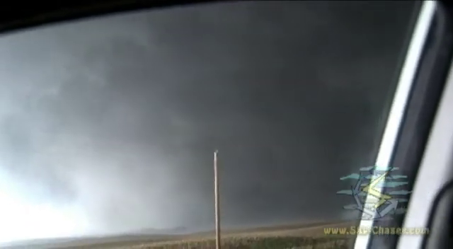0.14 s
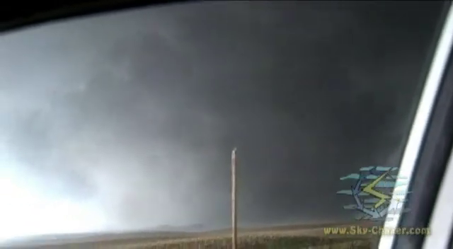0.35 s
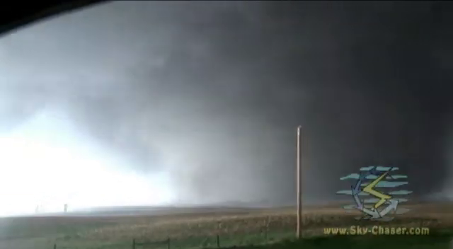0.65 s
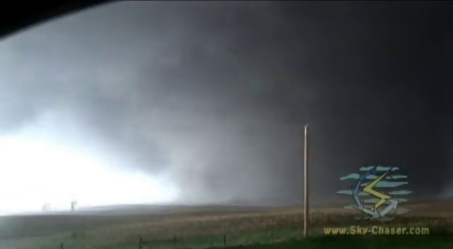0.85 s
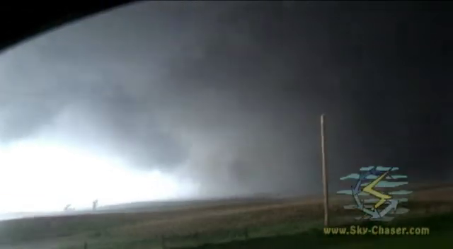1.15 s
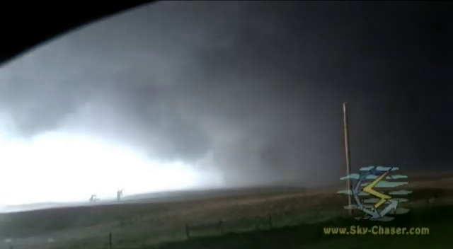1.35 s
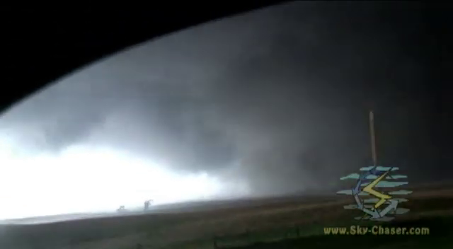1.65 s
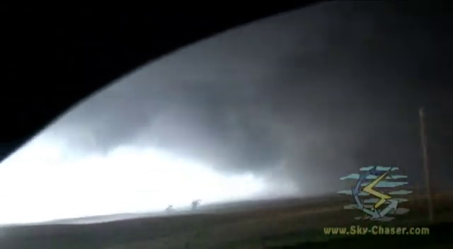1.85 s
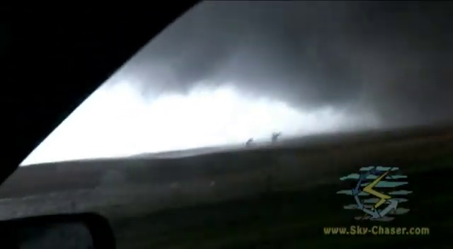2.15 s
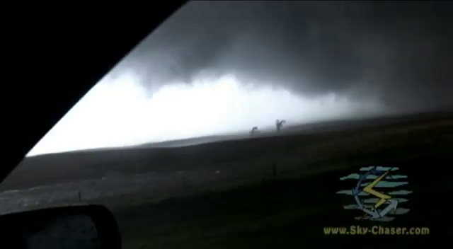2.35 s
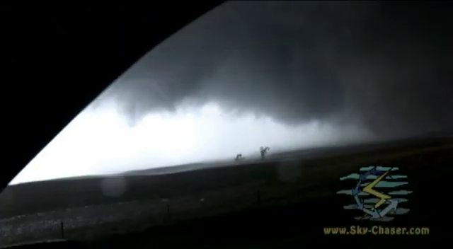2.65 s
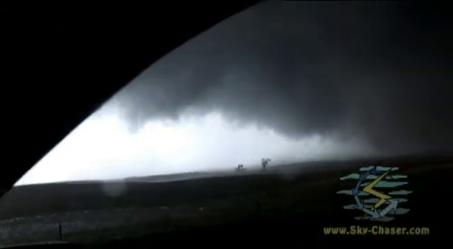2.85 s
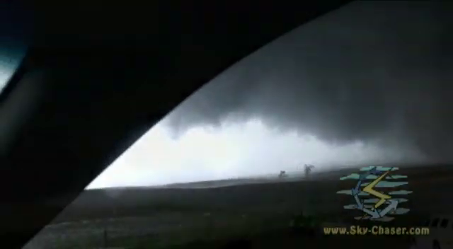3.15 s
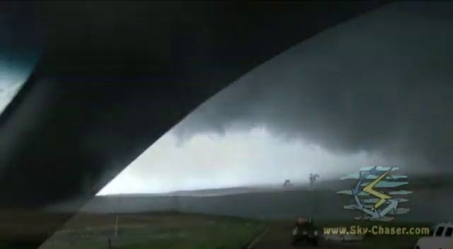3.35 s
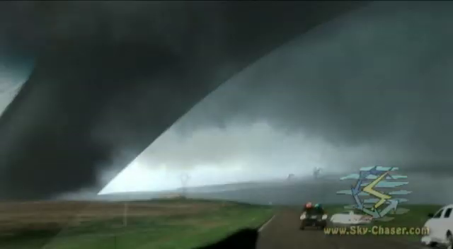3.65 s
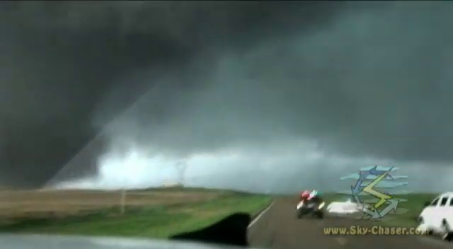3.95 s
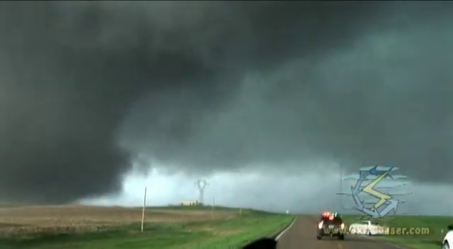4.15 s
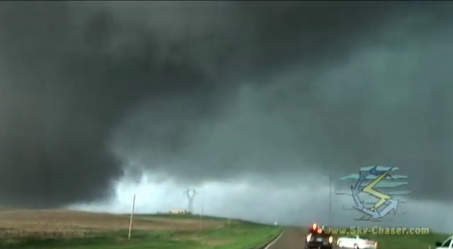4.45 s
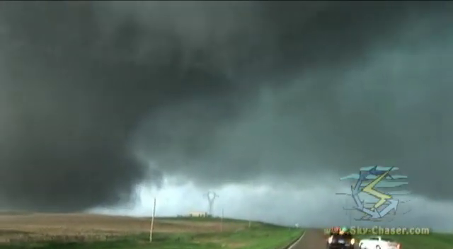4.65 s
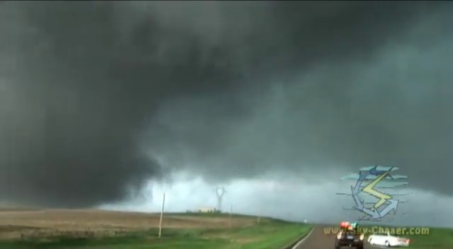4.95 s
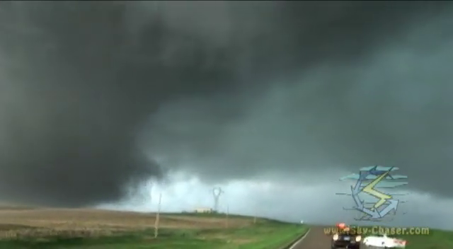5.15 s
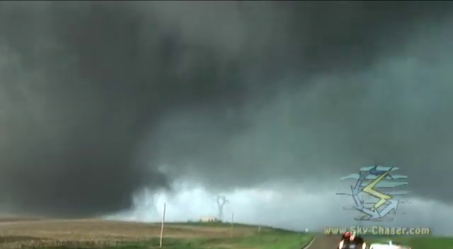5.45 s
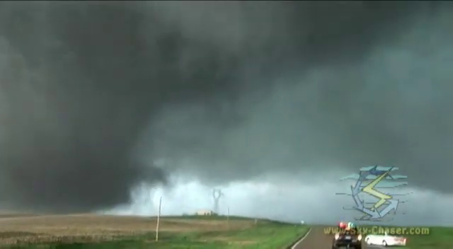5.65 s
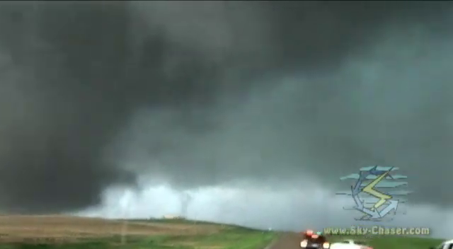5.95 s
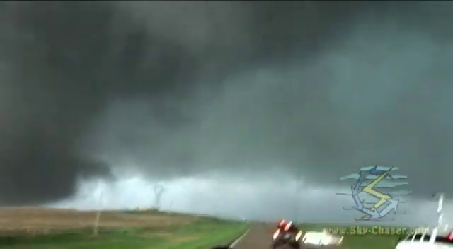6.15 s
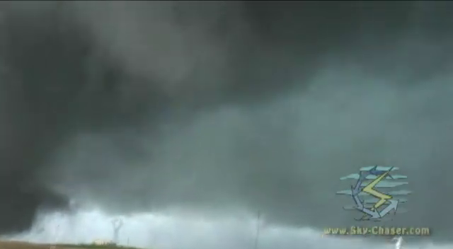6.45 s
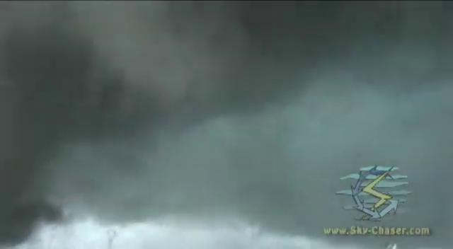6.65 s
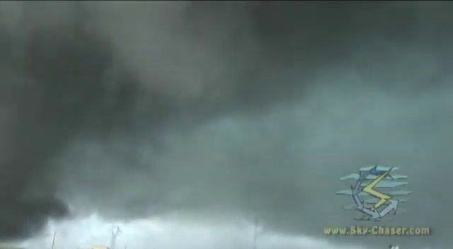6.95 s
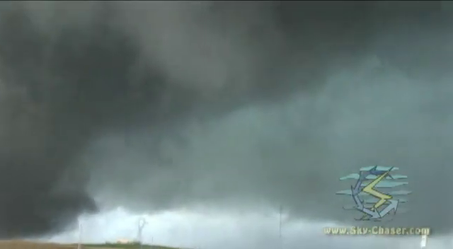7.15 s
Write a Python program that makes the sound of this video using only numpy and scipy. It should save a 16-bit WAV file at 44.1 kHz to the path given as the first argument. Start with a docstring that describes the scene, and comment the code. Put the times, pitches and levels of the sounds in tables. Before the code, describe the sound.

Storm wind heard from a car on open grassland. At first it is sheltered: lumpy cabin rumble, airy window rush, scattered rain splashes, small plastic ticks and a few dull knocks, one strong. Then the exposed stereo microphone is struck directly by gusts, and the sound becomes a much louder tearing, fluttering roar with sharp overload pops, continuing to the cut.

```python
"""Storm wind tears across a camera's two-port microphone in a car with its side window open.
The airstream is noise in three layers, roar, tearing and hiss, shaken by gusts, lulls and flutter.
It arrives after about three seconds, with a low burble and pops made of short pressure pulses.
Before that the sheltered cabin booms and air rushes at the window, both made of coloured noise.
Rain is splash-shaped noise, knocks are fading panel tones with clatter, and ticks and whistles are narrow noise."""
import sys
import numpy as np
from scipy import signal
from scipy.fft import rfft, irfft, next_fast_len
from scipy.io import wavfile
from scipy.ndimage import uniform_filter1d

SR = 44100
rng = np.random.default_rng(int(sys.argv[2]) if len(sys.argv) > 2 else 0)


def transcribe(signal):
    """Save signal, clipped to [-1, 1], as a 16-bit WAV file at the path in sys.argv[1]."""
    frames = np.atleast_2d(signal).T
    limited = np.clip(frames, -1, 1)
    pcm = np.round(limited * 32767).astype(np.int16)
    wavfile.write(sys.argv[1], SR, pcm)


N = 321930
TIME = np.arange(N) / SR
SIZE = 2 * next_fast_len(N // 2 + 8192)  # transform length, with spare room for sounds to ring out
HZ = np.fft.rfftfreq(SIZE, 1 / SR)

# slow drift of the sheltered air: start_s, window_rush_db, cabin_rumble_db
SHELTER = [(0, -40, -30), (.55, -40, -34.5), (.88, -41, -36), (1.3, -39, -31), (1.68, -43, -37.5),
           (2.3, -41.5, -33.5), (2.7, -42, -36.5), (2.9, -41.5, -27), (3.15, -43.5, -28.5)]
# colour of the airstream at the two ports: pitch_hz, level_db (per Hz), left_minus_right_db, likeness (0-1)
STREAM_COLOUR = [(25, -16, 4, 0.9), (67, -6.5, -0.5, 0.93), (135, 1.5, 2, 0.96), (288, 1.5, 1, 0.54),
                 (583, -4, 0, 0), (945, -5, 5, 0.34), (1530, -10, 1, 0.75), (2520, -14, 1, 0.88),
                 (2820, -19.5, 0.5, 1), (3200, -17.5, 0, 1), (4270, -23.5, 2.5, 0.56),
                 (5850, -25, 3.5, 0.54), (7850, -44.5, -1.5, 0.89), (8600, -32, 3, 0.53),
                 (9200, -38.5, 1.5, 0.7), (13600, -32.5, 8, 0.03)]
# colour of the window rush: pitch_hz, level_db (per Hz), left_minus_right_db, likeness (0-1)
RUSH_COLOUR = [(90, -8, .3, 0.86), (314, -13.5, 1.2, 0.88), (490, -16.5, 6.3, 0.66), (730, -17, 1.4, 0.55),
               (1250, -19.5, 0.56, 0.77), (1830, -21, 1, 0.78), (2140, -21.5, 0.72, 0.93),
               (3460, -29, 0.81, 0.91), (4670, -43.5, 2.9, 0.36), (5850, -60, 2.7, 1), (6700, -71, .5, 1),
               (10200, -47, 1.7, .56), (14500, -65, 2.5, .3)]
# colour of the raindrops: pitch_hz, level_db (per Hz), left_minus_right_db, likeness (0-1)
DROP_COLOUR = [(300, -8, -5, 1), (1200, 3.5, -4, 0.51), (3300, 7.5, 1, 0.67), (4560, 1, 2.5, 0.35),
               (5940, 2.5, 3, 0.76), (7000, -9.5, -2, 0.94), (10300, -9.5, 3.5, 0.36), (14000, -5, 2, .3),
               (16000, -11, 2, .3)]
# colour of the cabin's rumble: pitch_hz, level_db (per Hz)
RUMBLE_COLOUR = [(30, -13.5), (70, -5), (110, 1), (175, -2), (225, -6.5), (290, -23), (700, -54),
                 (2000, -80)]
# colour of the cabin's slow swings: pitch_hz, level_db (per Hz)
SWING_COLOUR = [(8, -3.5), (20, -1), (34, -3), (55, -9), (85, -18.5), (160, -30), (500, -99)]
# resonances of the window gap: pitch_hz, width_hz, level_db
GAP = [(480, 83, -8.5), (1562, 170, -16), (2350, 350, -10), (5250, 120, -29)]
# moments when the flow stalls: centre_s, depth_db, half_length_s
LULLS = [(.066, 6, 0.016), (.403, 3, 0.014), (.54, 4, .009), (.73, 10, 0.012), (.83, 1.5, 0.045),
         (1.128, 6, 0.006), (1.413, 13, 0.009), (1.522, 11, 0.0094), (1.594, 8, 0.01), (1.982, 8.5, 0.01),
         (2.059, 6.5, 0.019), (2.375, 11, 0.013), (2.501, 5.5, 0.024), (2.815, 5, 0.011), (3.11, 6, 0.012),
         (3.18, 5.5, 0.011), (3.385, 6, 0.007), (3.426, 4, 0.0099), (3.536, 4, 0.008), (3.617, 4, 0.0063),
         (3.656, 5.5, .006), (3.732, 3, 0.01), (3.989, 8.5, 0.0075), (4.11, 3.5, 0.022), (4.142, 5.5, 0.01),
         (4.48, 6, 0.006), (4.592, 3, 0.027), (4.658, 9, 0.0041), (4.765, 6, 0.0049), (4.827, 2.5, .011),
         (5.288, 2, 0.027), (5.332, 6, 0.0053), (5.5, 4.5, 0.019), (5.67, 3.5, .008), (5.736, 7, 0.0051),
         (5.946, 6, 0.0071), (5.991, 2, .006), (6.137, 3, .012), (6.362, 5, 0.013), (6.4, 3.5, 0.03),
         (6.643, 3, .007), (6.826, 7.5, 0.014), (6.899, 7, 0.019), (7.107, 4, 0.0071), (7.255, 3, .008)]
# large raindrops splashing on the window frame: start_s, level_db
DROPS = [(0.2219, -36.5), (0.3153, -43), (0.338, -36), (.371, -43), (0.571, -34), (0.655, -39.5),
         (0.7642, -43), (0.922, -37.5), (1.059, -42), (1.157, -42), (1.238, -49), (1.271, -47),
         (1.296, -47), (1.3518, -41), (1.3758, -35.5), (1.448, -38.5), (1.492, -39.5), (1.7264, -37),
         (1.815, -46), (1.872, -48), (1.9107, -42), (1.947, -35), (2.101, -43), (2.124, -39.5),
         (2.184, -41), (2.224, -37), (2.336, -35), (2.405, -32.5), (2.4384, -38.5), (2.6, -35.5),
         (2.7142, -37.5), (2.842, -48), (2.8615, -36), (2.9185, -38), (3.039, -47), (3.068, -41)]
# light ticks of hard plastic: start_s, level_db, pitch_hz, width_hz
TICKS = [(1.107, -25, 2300, 800), (1.45, -22, 2750, 1500), (1.692, -17.5, 2290, 500)]
# knocks against the door: start_s, boom_db, clatter_db
KNOCKS = [(.355, -20, -36), (1.152, -26, -41), (1.7626, -15.5, -16), (1.772, -32, -25),
          (2.124, -21.5, -35.5), (2.86, -24, -42)]
# ringing tones of the door panel: pitch_hz, level_db, fade_by_60_db_s
PANEL = [(132.6, 8.5, 0.075), (309, 8.5, 0.031), (613, 12.5, 0.017), (917, -8, 0.047), (1355, 3.5, 0.02),
         (2260, -5.5, 0.061), (2590, -5, .045), (3480, -8, 0.045), (5600, -10, .035)]
# colour of the clattering loose trim: pitch_hz, level_db (per Hz)
CLATTER_COLOUR = [(100, -2), (350, 5.5), (600, 2), (900, -9), (1400, -6.5), (1900, -10.5), (2400, -4),
                  (3000, -12), (3550, -12), (4200, -14.5), (4700, -24), (5200, -12), (5700, -18),
                  (7200, -28), (11000, -25), (16000, -27)]
# sharp pops at the grille: peak_s, level_db
POPS = [(3.884, -16), (5.461, -14), (5.714, -14), (5.895, -14), (5.974, -13), (6.19, -14), (6.339, -8),
        (7.129, -10), (7.135, -11), (7.271, -14), (7.282, -12)]
# the cavity between the ports turns one against the other: pitch_hz, left_lead_radians
PORT_LEAD = [(300, -.15), (800, -.1), (1300, -.6), (2200, -.35), (3300, 0), (3700, .3), (4400, 1.5),
             (5100, 1.5), (5700, 2.7), (7000, 3.1), (9300, 3.4), (10000, 5.8), (14000, 6.4), (16000, 8)]
# edges whistle and hiss hoarsely: centre_s, level_db, half_length_s, pitch_hz, width_hz
WHISTLES = [(.3, -46, 0.22, 1547, 170), (2.747, -42, 0.058, 1710, 290), (6.53, -34, 0.12, 2710, 1700),
            (6.73, -37, .04, 2910, 1400), (7.123, -41.5, 0.13, 3096, 1000)]
# gusts that strengthen the fine drops: centre_s, extra_db, half_length_s
FLURRIES = [(.33, 0, 0.065), (1.24, 9.5, 0.15), (1.79, 7.5, 0.026)]
# pressure buffets through the open window: centre_s, extra_db, half_length_s
BUFFETS = [(.118, 4, 0.056), (.373, 7, .025), (1.143, 7, 0.042), (1.385, 15, 0.045), (1.53, 6.5, 0.061),
           (1.954, 10, 0.026), (2.361, 9, 0.017), (2.788, 6, .03), (3.35, 10.5, 0.087)]
# the grille's hiss, which changes as the camera turns in the airstream: start_s, level_db
HISS = [(3.5, -46), (4.4, -46), (4.85, -45), (5.15, -46.5), (5.75, -45.5), (6.1, -46), (6.5, -48),
        (7.3, -50)]
# gusts that strike the ports: centre_s, extra_tearing_db, extra_roar_db, half_length_s
GUSTS = [(3.31, 5, 0, 0.0075), (3.356, 4, 11.5, 0.0062), (3.408, 4, -1, .006), (3.446, 4, 4, 0.007),
         (3.512, 7, 4, 0.013), (3.566, 8.5, 6, 0.0041), (3.631, 2, 4, 0.0076), (3.674, 5.5, 5, 0.0076),
         (3.758, 4, 9, 0.0084), (3.823, 4.5, -3, 0.0075), (3.885, 5, 1, 0.016), (4.003, -0.5, 9, 0.0062),
         (4.168, 4.5, 3, 0.012), (4.236, 5.5, 3, 0.009), (4.349, 8, -4, 0.0043), (4.379, 6, -8, 0.01),
         (4.424, 5.5, 0, 0.011), (4.462, 6, 6, 0.0091), (4.506, 6.5, 4.5, 0.02), (4.71, 3, 2.5, 0.047),
         (4.787, 5, 3, 0.0083), (4.862, 5, -4, 0.015), (4.93, 3, 6.5, 0.018), (5.366, 5, 4.5, 0.024),
         (5.414, 6.5, 4, 0.0082), (5.442, 3, -1.5, 0.035), (5.761, 1, 8.5, .007), (5.798, -2, 7, 0.0094),
         (5.925, 4, 6, 0.0069), (6.012, 7, -1, 0.013), (6.065, 6.5, 4, 0.0067), (6.185, 4.5, 4, 0.0087),
         (6.314, 2.5, 1.5, 0.019), (6.534, 3, -2.5, 0.038), (6.585, 6.5, -1, 0.0054), (6.658, 1, 5, 0.011),
         (6.755, 2, 3.5, 0.033), (6.955, 2, 7, 0.0094), (7.04, 4, 4, 0.01), (7.128, 5, 4, .005),
         (7.147, 6, 3, 0.01), (7.219, 1.5, 7, 0.01), (7.283, 2, 0, 0.0042)]

# the bands that the levels refer to: low_hz, high_hz
SWING_BAND, RUMBLE_BAND, RUSH_BAND, DROP_BAND = (18, 80), (90, 280), (600, 4000), (4000, 16000)
ROAR_BAND, TEAR_BAND, HISS_BAND, FULL_BAND = (100, 500), (700, 4000), (9000, 16000), (20, 16000)
# level of the swing between buffets, and the part of a buffet that the rumble follows
SWING_DB, BUFFET_RUMBLE_SHARE = -31, 0.14
# the microphone moves into the airstream: when it starts and how long it takes
EXPOSED_S, EXPOSING_S = 3.053, 0.54
# from then on the air sounds of the shelter die away
SHELTER_ENDS_S, RUSH_FADE_DB_PER_S, RUMBLE_FADE_DB_PER_S, SWING_FADE_DB_PER_S = 3.15, 16, 32, 41
ROAR_DB, TEAR_DB = -29.5, -30.5  # before gusts, lulls and flutter
DROP_SPLASH_S, DROP_SNAP_S = 0.006, 0.00045  # decay times
CEILING = 0.62  # peaks are rounded off towards this share of full scale
EDGE_HZ = 15880  # upper limit of the sound


def gain_of(db):
    """Turns decibels into amplitude."""
    return 10 ** (np.asarray(db) / 20)


def read(points):
    """Reads each column of a colour table at every frequency, on a log-frequency axis."""
    hz, *columns = np.transpose(points)
    return [np.interp(np.log(HZ + 1), np.log(hz), column) for column in columns]


def follow(rows):
    """Reads each column of a time table at every sample."""
    s, *columns = np.transpose(rows)
    return [np.interp(TIME, s, column) for column in columns]


def bumps(rows):
    """Adds up brief bell-shaped changes of level, in dB."""
    return sum(db * np.exp(-((TIME - s) / half) ** 2) for s, db, half in rows)


def gust_bumps():
    """Gives the changes that the gusts make to the tearing and to the roar, in dB."""
    tear_db = bumps((s, tear, half) for s, tear, _, half in GUSTS)
    roar_db = bumps((s, roar, half) for s, _, roar, half in GUSTS)
    return tear_db, roar_db


def exposure():
    """Rises steadily from 0 to 1 as the microphone moves into the airstream."""
    return np.clip((TIME - EXPOSED_S) / EXPOSING_S, 0, 1)


def fading(db_per_s):
    """Gives the level that a sheltered sound loses once the microphone is out in the wind, in dB."""
    return db_per_s * np.maximum(TIME - SHELTER_ENDS_S, 0)


def add(mix, s, sound):
    """Mixes a sound in at a time, cutting it off at the end."""
    part = mix[..., round(s * SR):][..., :sound.shape[-1]]
    part += sound[..., :part.shape[-1]]


def wander(slow_hz, fast_hz):
    """Makes turbulence of unit size, with about equal power per octave between two rates."""
    shape = HZ / (HZ ** 2 + slow_hz ** 2) ** (3 / 4) / (1 + (HZ / fast_hz) ** 2)
    x = irfft(rfft(rng.standard_normal(SIZE)) * shape)[:N]
    return x / x.std()


def causal(db):
    """Gives the response of a body that has this gain and rings only after it is struck."""
    log_gain = np.log(gain_of(db))
    circle = np.concatenate([log_gain, log_gain[-2:0:-1]])  # mirrored into the negative frequencies
    return np.exp(np.conj(signal.hilbert(circle)))[:len(HZ)]


def band_gain(power, band):
    """Gives the average (rms) level of unit white noise in a band after this power response."""
    low_hz, high_hz = band
    return np.sqrt(np.mean(power * (HZ > low_hz) * (HZ < high_hz)))


def coloured(x, colour, band):
    """Filters a sound to a colour so that unit white noise keeps unit level in a band."""
    response = causal(read(colour)[0])
    return irfft(rfft(x, SIZE) * response / band_gain(abs(response) ** 2, band))[..., :N]


def ports(pair, colour, band):
    """Mixes two separate noises in the cavity behind the grille, at unit gain in a band."""
    db, balance_db, like = read(colour)
    like, lead = np.clip(like, 0, 1), read(PORT_LEAD)[0]
    # the common part is alike at both ports; the opposed part has opposite signs
    common = np.sqrt((1 + like) / 2) * np.ones((2, 1))
    opposed = np.sqrt((1 - like) / 2) * np.array([[1], [-1]])
    share = gain_of([balance_db / 2, -balance_db / 2])
    share = share / np.linalg.norm(share, axis=0)
    response = causal(db) * share * np.exp([0 * lead, -1j * lead])
    power = abs((response * common).mean(0)) ** 2 + abs((response * opposed).mean(0)) ** 2
    left, right = rfft(pair, SIZE)
    mixed = (common * (left + right) + opposed * (left - right)) / np.sqrt(2)
    return irfft(response * mixed)[:, :N] / band_gain(power, band)


def eddies(depth_db, slow_hz, fast_hz):
    """Makes noise at each port that swells and collapses with that port's own eddies."""
    swell = gain_of(depth_db * np.array([wander(slow_hz, fast_hz), wander(slow_hz, fast_hz)]))
    return swell / np.sqrt(np.mean(swell ** 2)) * rng.standard_normal((2, N))


def narrow(hz, width_hz):
    """Makes noise of unit level in one fixed resonance."""
    x = signal.lfilter(*signal.iirpeak(hz, hz / width_hz, SR), rng.standard_normal(N))
    return x / x.std()


def drifting(hz, width_hz, octaves, slow_hz, fast_hz):
    """Makes noise of unit level in a resonance whose centre wanders."""
    turns = np.cumsum(hz * 2 ** (octaves * wander(slow_hz, fast_hz))) / SR
    shape = 1 / (1 + (2 * HZ / width_hz) ** 2)
    a, b = irfft(rfft(rng.standard_normal((2, SIZE))) * shape)[:, :N]
    x = a * np.cos(2 * np.pi * turns) + b * np.sin(2 * np.pi * turns)
    return x / x.std()


def cabin():
    """The air in the car booms in lumps and swings slowly with each buffet, alike at both ports."""
    buffet_db = bumps(BUFFETS)
    rumble_db = follow(SHELTER)[1] + BUFFET_RUMBLE_SHARE * buffet_db - bumps(LULLS)
    rumble_db = rumble_db - fading(RUMBLE_FADE_DB_PER_S) + wander(slow_hz=8.2, fast_hz=25)
    swing_db = SWING_DB + buffet_db - fading(SWING_FADE_DB_PER_S)
    rumble = coloured(rng.standard_normal(N), RUMBLE_COLOUR, RUMBLE_BAND)
    swing = coloured(rng.standard_normal(N), SWING_COLOUR, SWING_BAND)
    swing /= np.sqrt(uniform_filter1d(swing ** 2, size=4000))  # evens out its own ups and downs
    return gain_of(rumble_db) * rumble + gain_of(swing_db) * swing


def window_rush(flutter_db=1.65, stream_db=-0.2):
    """Air shears off the window edge, now and then stalling, and stirs the hollow resonances of the gap."""
    rush_db = follow(SHELTER)[0] - bumps(LULLS) - fading(RUSH_FADE_DB_PER_S)
    force = gain_of(rush_db + flutter_db * wander(slow_hz=6.3, fast_hz=32.2))
    hollow = 0
    for hz, width_hz, db in GAP:
        hollow = hollow + gain_of(db) * drifting(hz, width_hz, octaves=0.02896, slow_hz=2.38, fast_hz=11.8)
    drive = rng.standard_normal((2, N)) * force * gain_of(stream_db)
    return ports(drive, RUSH_COLOUR, RUSH_BAND) + force * hollow


def whistles():
    """For a moment the flow locks into an airy note, made of narrow noise that wavers in pitch."""
    out = 0
    for s, db, half_s, hz, width_hz in WHISTLES:
        swell = np.exp(-((TIME - s) / half_s) ** 2)
        out = out + gain_of(db) * swell * drifting(hz, width_hz, octaves=0.0206, slow_hz=6.1, fast_hz=25)
    return out


def rain(per_s=170, fine_db=-62, large_db=-8.5, rise_s=0.0012, spray_s=0.028, spray_db=-12,
         snap_db=4, snap_at_s=0.0022):
    """Each drop bursts with a dry snap and scatters into spray; fine drops fall at random times."""
    t = np.arange(SR // 8) / SR
    decay = np.exp(-t / DROP_SPLASH_S) + gain_of(spray_db) * np.exp(-t / spray_s)
    splash = (1 - np.exp(-t / rise_s)) * decay
    snap = gain_of(snap_db) * np.exp(-abs(t - snap_at_s) / DROP_SNAP_S)
    splash = splash / splash.max() + snap
    size_db = fine_db + bumps(FLURRIES) + 2.0 * np.minimum(rng.exponential(1, N), 3)
    hits = gain_of(size_db) * (rng.random(N) < per_s / SR)
    for s, db in DROPS:
        add(hits, s, gain_of([db + large_db]))
    # overlapping drops add as power
    envelope = np.sqrt(abs(signal.fftconvolve(hits ** 2, splash ** 2)[:N]))
    envelope = envelope / gain_of(bumps(LULLS))
    return ports(envelope * eddies(depth_db=1.5, slow_hz=350, fast_hz=1800), DROP_COLOUR, DROP_BAND)


def ticks(rise_s=0.0019, decay_s=0.0045):
    """Small plastic parts tick with one well damped ring, made of a burst of narrow noise."""
    t, out = np.arange(SR // 20) / SR, np.zeros(N)
    envelope = (1 - np.exp(-t / rise_s)) * np.exp(-t / decay_s)
    for s, db, hz, width_hz in TICKS:
        ring = signal.lfilter(*signal.iirpeak(hz, 2, SR), narrow(hz, width_hz)[-len(t):])
        add(out, s, gain_of(db) * ring * envelope)
    return out


def knocks(hold_s=0.0084, dulling=0.71, swell_s=0.0023, swell_cycles=0.49):
    """A blow clatters briefly and leaves the door panel booming; its high tones speak first."""
    t = np.arange(SR // 4) / SR
    boom, drive = np.zeros((2, N)), np.zeros(N)
    contact = (1 - np.exp(-t / 0.0047)) * (np.exp(-(t / hold_s) ** 2) + 0.15 * np.exp(-t / 0.0087))
    for s, boom_db, clatter_db in KNOCKS:
        # per octave above the second tone: the less clatter against boom, the duller the ring
        tilt_db = dulling * min(clatter_db - boom_db, 0)
        for k, (hz, db, t60_s) in enumerate(PANEL):
            level_db = boom_db + db + tilt_db * max(np.log2(hz / PANEL[1][0]), 0)
            swell = 1 - np.exp(-(t / (swell_s + swell_cycles / hz)) ** 2)
            tone = gain_of(level_db - 60 * t / t60_s) * np.sin(2 * np.pi * hz * t)
            add(boom, s, (-1) ** k * tone * swell)
        add(drive, s, gain_of(clatter_db) * contact)
    # partly shared by the ports, partly separate
    grit = rng.standard_normal(N) + 1.23 * rng.standard_normal((2, N))
    return boom + coloured(drive * grit, CLATTER_COLOUR, FULL_BAND)


def pops(spike_s=0.00008, push_s=0.0005):
    """A pop is a pointed pressure spike and a short push behind it, stronger at the left port."""
    t, out = np.arange(-SR // 500, SR // 100) / SR, np.zeros(N)
    after = np.maximum(t, 0) / push_s
    push = after * (1 - after / 2) * np.exp(1 - after)
    pulse = np.exp(-abs(t) / spike_s) + push
    for s, db in POPS:
        add(out, s + t[0], gain_of(db) * pulse)
    return out * gain_of([[1.5], [-2]])  # left, right


def vortices(centre_hz=225, width_hz=130, level_db=-34, gust_share=0.5):
    """Vortices tumble off the camera body: a low burble slides in pitch and surges with the gusts."""
    surge_db = gust_share * gust_bumps()[1] - bumps(LULLS) + 0.47 * wander(slow_hz=10, fast_hz=40)
    burble = drifting(centre_hz, width_hz, octaves=0.33, slow_hz=6.95, fast_hz=28.1)
    return gain_of(level_db + surge_db) * exposure() * burble


def airstream(roar_hz=550, hiss_hz=6500, flutter_limit_db=3.0, hiss_share=0.71, roar_onset_power=0.6,
              rattle_db=1.15):
    """Large eddies roar, smaller ones tear and the grille hisses, sharing gust times, lulls and flutter."""
    gust_tear_db, gust_roar_db = gust_bumps()
    calm = gain_of(-2 * abs(gust_tear_db))  # the flow flutters between gusts and holds firm within them
    flutter_db = calm * flutter_limit_db * np.tanh(wander(slow_hz=16, fast_hz=35) / 2) - bumps(LULLS)
    flutter_db = flutter_db + rattle_db * wander(slow_hz=60, fast_hz=200)  # quick eddies shake all layers
    tear_db = flutter_db + gust_tear_db
    roar_db = flutter_db + gust_roar_db
    hiss_db = hiss_share * tear_db + follow(HISS)[0]
    exposed = exposure()

    roar = eddies(depth_db=2.0, slow_hz=22.6, fast_hz=181) * exposed ** roar_onset_power
    tear = eddies(depth_db=2.0, slow_hz=35.3, fast_hz=352) * exposed
    hiss = eddies(depth_db=0.3, slow_hz=35, fast_hz=350) * exposed
    # how the three layers share the power at each frequency
    low = 1 / (1 + (HZ / roar_hz) ** 4)
    high = 1 - 1 / (1 + (HZ / hiss_hz) ** 6)
    layers = [(roar, ROAR_DB + roar_db, low, ROAR_BAND),
              (tear, TEAR_DB + tear_db, 1 - low - high, TEAR_BAND),
              (hiss, hiss_db, high, HISS_BAND)]
    out = 0
    for drive, db, share, band in layers:
        sound = ports(drive * gain_of(db), STREAM_COLOUR, band)
        out = out + irfft(rfft(sound, SIZE) * np.sqrt(abs(share)))[:, :N]
    return out


def scene():
    """Mixes the sheltered sounds with the open airstream that takes over."""
    sheltered = cabin() + window_rush() + whistles() + rain() + ticks() + knocks()
    return sheltered + pops() + vortices() + airstream()


def record(dry):
    """Rounds off the highest peaks, then removes the sound above the upper limit."""
    rounded = dry / (1 + (dry / CEILING) ** 6) ** (1 / 6)
    lowpass = signal.firwin(511, EDGE_HZ, window=("kaiser", 9), fs=SR)
    return signal.oaconvolve(rounded, lowpass[None], "same")


dry = scene()
out = record(dry)
transcribe(out)
```